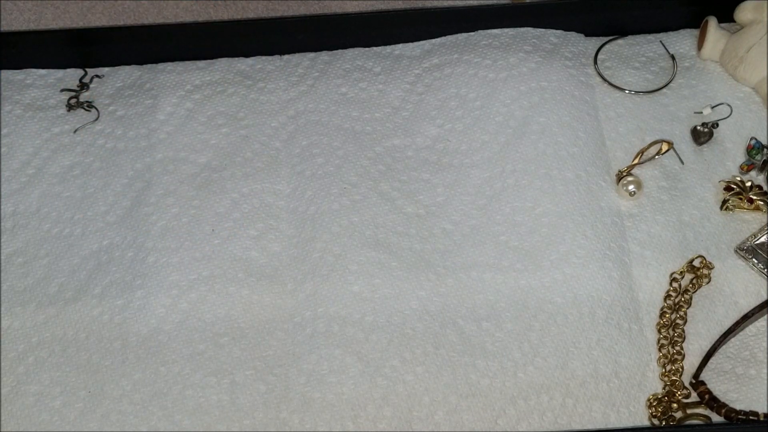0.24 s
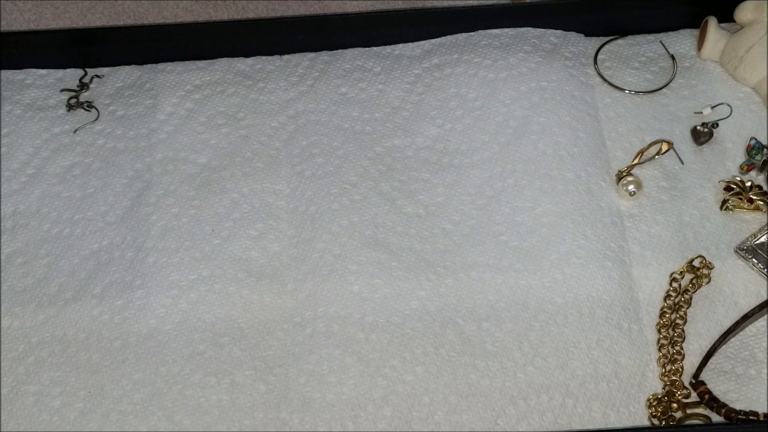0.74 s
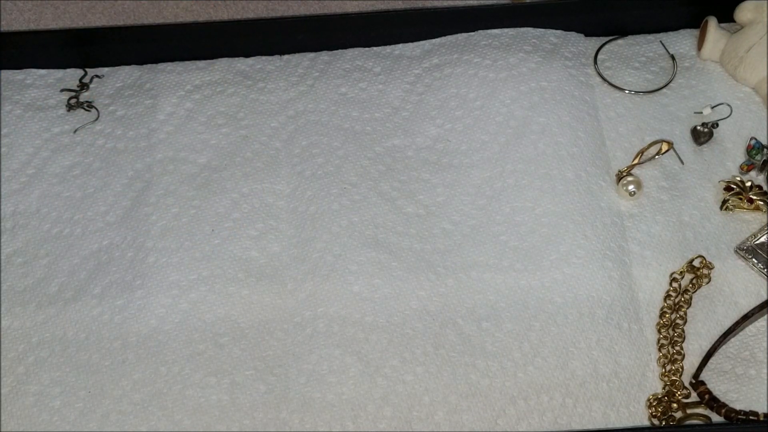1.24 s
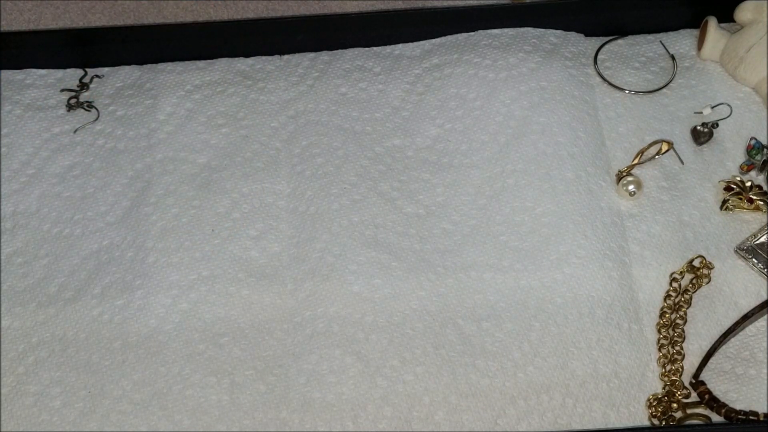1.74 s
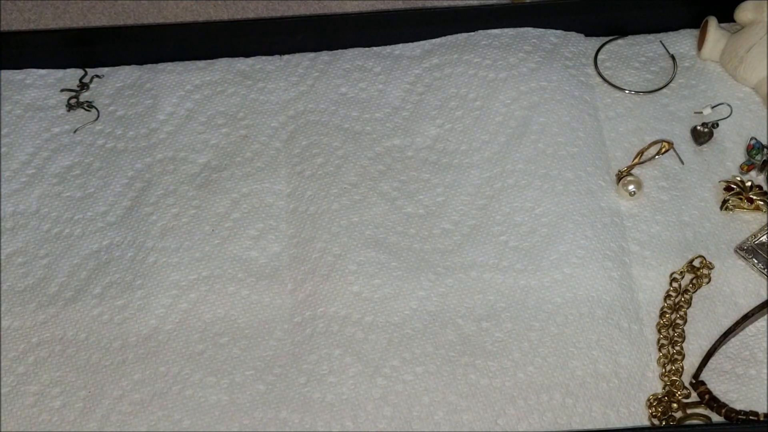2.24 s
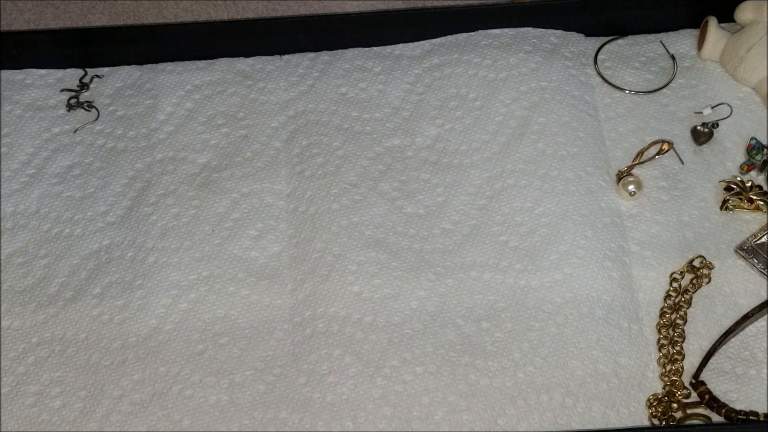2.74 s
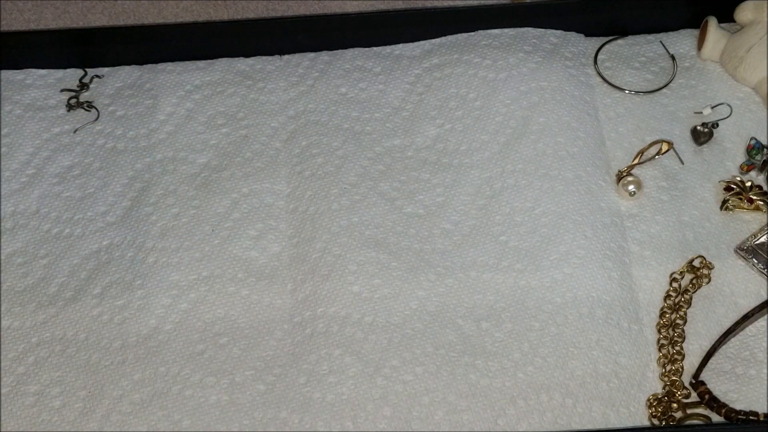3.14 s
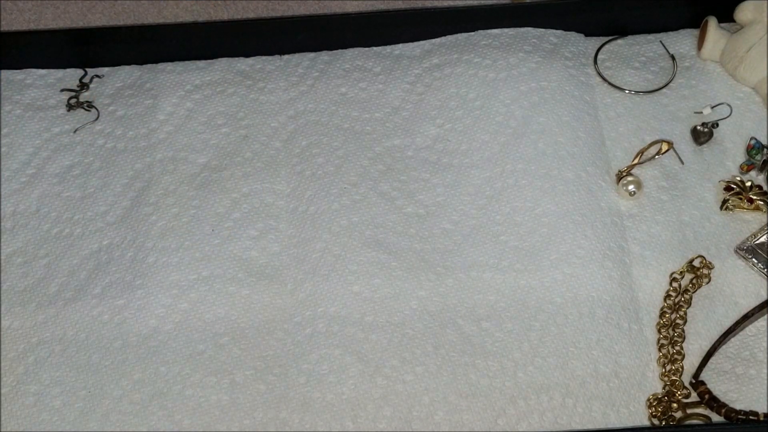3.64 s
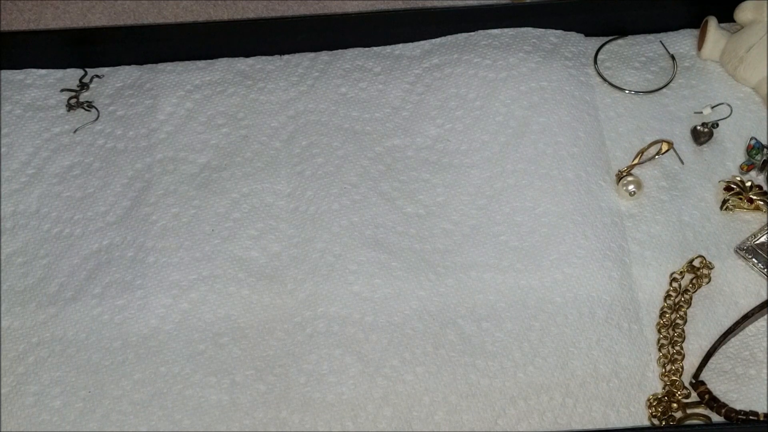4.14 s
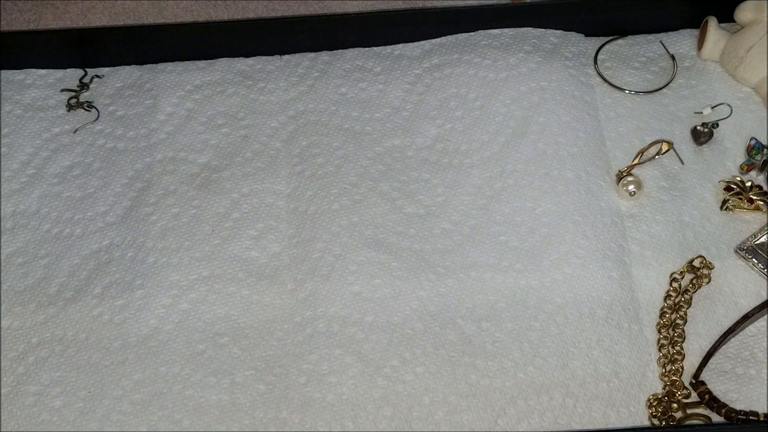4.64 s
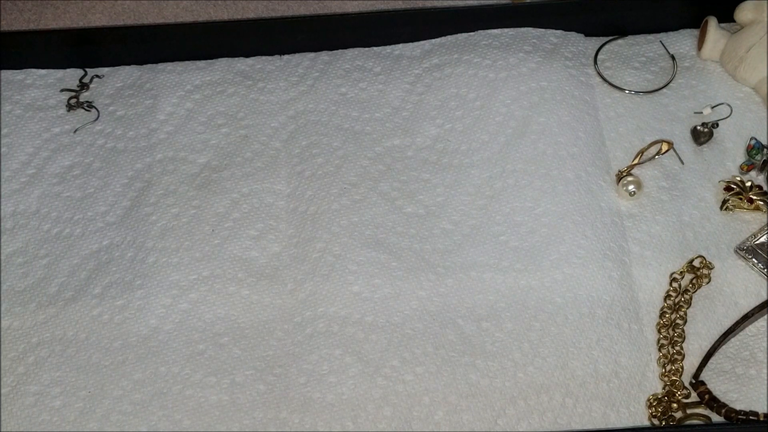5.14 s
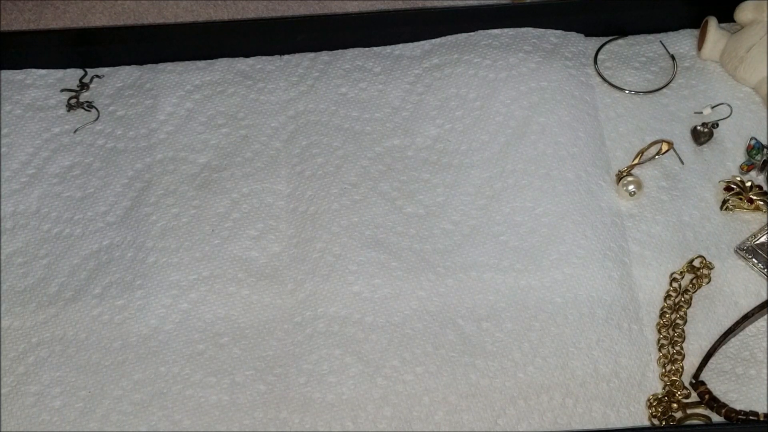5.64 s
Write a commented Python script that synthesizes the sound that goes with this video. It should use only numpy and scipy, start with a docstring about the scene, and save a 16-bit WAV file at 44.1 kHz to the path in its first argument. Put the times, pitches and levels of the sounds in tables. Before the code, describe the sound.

Jewelry is sorted at a table, heard very close and dry, slightly to the right. Sparse faint ticks come first, then a short scrape and the loudest moment: a hard clack with rapid bounces. Near-silence follows, broken by a dull knock, before high metallic clinks and rustling chains jangle irregularly in a jar with low thuds until the end.

```python
"""Jewelry is sorted at a table in a quiet, faintly hissing room, close to two microphones.
Small pieces tick in the fingers; a hard piece scrapes, drops, bounces and rattles to rest; the table takes
a dull knock; then a hand rummages in a jar: chains and trinkets clink and jangle, and bump the jar.
Each contact is a snap, a crack of coloured noise and decaying sine modes; single contacts are placed
by time, and sliding, rubbing and rattling are many random small ones."""
import sys
import numpy as np
from scipy import signal
from scipy.fft import rfft, irfft, next_fast_len
from scipy.io import wavfile
from scipy.ndimage import uniform_filter1d

SR = 44100
rng = np.random.default_rng(int(sys.argv[2]) if len(sys.argv) > 2 else 0)


def wav_out(sig):
    """Save sig, one row per channel (or a flat mono array), as 16-bit PCM at SR to the path in sys.argv[1]."""
    wavfile.write(sys.argv[1], SR, np.round(np.clip(np.atleast_2d(sig).T, -1, 1) * 32767).astype(np.int16))


N = 259749
SIZE = 12288  # samples per contact sound
T = np.arange(SIZE) / SR
HZ = np.fft.rfftfreq(SIZE, 1 / SR)
PIECE_SIZES = .09  # pitch spread among small pieces, natural-log units

# strokes of the hand through the jar: start_s, length_s, chains_sliding_db (relative),
# heap_rubbing_wall_db (relative)
STIRS = [(4.238, 0.027, -76, -57.5), (4.386, 0.077, -52.5, -58.5), (4.483, 0.12, -49.5, -54),
         (4.565, 0.19, -45, -55), (4.77, 0.14, -62.5, -67.5), (4.909, 0.11, -49, -57),
         (5.022, 0.16, -46, -56), (5.20, 0.024, -35.5, -52), (5.337, 0.23, -64, -65.5),
         (5.511, 0.053, -41, -57.5), (5.615, 0.043, -44, -55.5), (5.695, 0.099, -63, -55.5),
         (5.784, 0.077, -75, -47)]
# a stroke gathers speed, holds, then settles (time to fall 60 dB)
STIR_ATTACK_S, STIR_SETTLE_S = 0.018, 0.19


def amp(db):
    """Decibels to gain."""
    return 10 ** (np.asarray(db) / 20)


def read(points, hz):
    """A spectrum joined by straight lines on a log-frequency axis."""
    f, value = np.transpose(points)
    return np.interp(np.log(hz + 1), np.log(f + 1), value)


def unit(x):
    """Scales each stereo sound to a mean energy of 1 per channel."""
    energy = (x ** 2).sum((-2, -1), keepdims=True) / 2
    return x / np.sqrt(energy + 1e-20)


def coloured(x, gain_db):
    """Minimum-phase filter: the colour rings after a click, never before it."""
    cepstrum = irfft(np.log(amp(gain_db)))
    cepstrum[..., 1:SIZE // 2] *= 2
    cepstrum[..., SIZE // 2 + 1:] = 0
    response = np.exp(rfft(cepstrum))
    return irfft(rfft(x) * response)


def ports(x, width):
    """Two close microphones: the side-to-mid ratio sets how alike they are at each frequency."""
    size = next_fast_len(N)
    left, right = rfft(x, size)
    side = amp(read(width, np.fft.rfftfreq(size, 1 / SR)))
    mid_part = left + right
    side_part = side * (left - right)
    pair = np.array([mid_part + side_part, mid_part - side_part])
    return irfft(pair / np.sqrt(2 + 2 * side ** 2), size)[:, :N]


def blows(count, modes, colour, crack_t60, snap_db, ring_db, scatter_db, sizes=0, patchy_db=0):
    """Different blows on one object: a snap, a crack of decaying noise, and its ringing modes."""
    crack = unit(rng.standard_normal((count, 2, SIZE)) * amp(-60 * T / crack_t60))
    crack[:, :, 0] += amp(snap_db)
    # each contact has broad peaks of its own, fullest in the treble
    patches = uniform_filter1d(rng.standard_normal((count, 1, len(HZ))), size=170)
    patches *= np.minimum(HZ / 4000, 1) / patches.std()
    crack = unit(coloured(crack, read(colour, HZ) + patchy_db * patches))

    hz, db, t60 = np.transpose(modes)[:, :, None]
    # pieces of other sizes ring at other pitches; modes up to 2500 Hz stay put
    detune = sizes * rng.standard_normal((count, len(modes), 1)) * (hz > 2500)
    pitch = hz * np.exp(detune)
    shapes = amp(db - 60 * T / t60) * np.sin(np.float32(2 * np.pi * pitch * T))

    # the place of contact sets each mode's strength; high modes reach each microphone with either sign
    chance = rng.standard_normal((count, 2, 2, len(modes)))
    weights = amp(scatter_db * np.clip(chance[:, 0], -1.5, 1.5))
    weights *= np.sign(chance[:, 1] + (1800 / hz.T) ** 2)
    weights *= (-1) ** np.arange(len(modes))  # neighbouring modes swing opposite ways
    ring = unit(weights @ shapes)
    return unit(crack + amp(ring_db) * ring)


def strikes(rows, sounds, gain_db, focus_db=0):
    """One blow per row, tilted in brightness and emphasized near its own centre frequency if it has one."""
    out = np.zeros((2, N + SIZE))
    octaves = np.log2(np.maximum(HZ, 300) / 2000)
    for (s, db, tilt, *centre), sound in zip(rows, sounds):
        focus = sum(np.exp(-(np.log2((HZ + 1) / hz) / 0.22) ** 2) for hz in centre)
        blow = unit(coloured(sound, tilt * octaves + focus_db * focus))
        start = round(s * SR)
        out[:, start:start + SIZE] += amp(db + gain_db) * blow
    return out[:, :N]


def by_pitch(rows, neutral_hz, slope_db):
    """Brightness (dB per octave) rises by slope_db for each octave of pitch above neutral_hz."""
    return [(s, db, slope_db * np.log2(hz / neutral_hz), hz) for s, db, hz in rows]


def motion(rows, attack_s, settle_s):
    """Strength of a run of movements: each rises, holds for its length, and dies away."""
    t = np.arange(N) / SR
    strokes = []
    for start, length, db in rows:
        rise = np.clip((t - start) / attack_s, 0, 1)
        after_s = np.maximum(t - start - length, 0)
        strokes.append(rise * amp(db - 60 * after_s / settle_s))
    return np.max(strokes, axis=0)


def patter(strength, sounds, per_s, spread_db, gain_db):
    """Many small random contacts whose force follows the strength of a movement."""
    moving = np.flatnonzero(strength > amp(-95))
    at = np.arange(moving[0], moving[-1])
    chance, force, which, side = rng.random((4, N))[:, at]
    clicks = (chance < per_s / SR) * amp(spread_db * force) * np.sign(side - .5)
    rms = np.sqrt(np.mean(clicks ** 2) + 1e-20)
    clicks *= strength[at] * amp(gain_db) / rms
    choice = (which * len(sounds)).astype(int)
    out = np.zeros((2, N + SIZE))
    for k, sound in enumerate(sounds):
        train = clicks * (choice == k)
        out[:, at[0]:at[-1] + SIZE] += signal.fftconvolve(train[None], sound, axes=1)
    return out[:, :N]


def air(waver_db):
    """Shaped noise: a low room murmur of machinery, wavering below 500 Hz, under faint microphone hiss."""
    # still room: hz, density_db (relative)
    air_spectrum = [(15, -58), (25, -33.5), (64, -10.5), (102, -17), (157, -7), (248, -3), (316, -12.5),
                    (403, -17.5), (473, -15), (542, -21.5), (691, -22), (812, -23), (2460, -25.5),
                    (8050, -39.5), (15800, -30.5)]
    # stereo width: hz, side_minus_mid_db
    air_width = [(60, -10.5), (110, -10), (200, -11.5), (380, -4), (700, -0.5), (1290, 0.5), (2380, 0),
                 (4400, -0.5), (8120, 0), (15000, 0)]
    rms_db = -62
    hz, t, z = signal.stft(rng.standard_normal((2, N)), SR, nperseg=2048, noverlap=1536)
    patches = uniform_filter1d(rng.standard_normal(z.shape[1:]), size=10, axis=1)
    patches = uniform_filter1d(patches, size=4, axis=0)
    waver = waver_db * patches / patches.std() * (hz < 500)[:, None]
    field_db = read(air_spectrum, hz)[:, None] + waver
    noise = signal.istft(z * amp(field_db), SR, nperseg=2048, noverlap=1536)[1][:, :N]
    return amp(rms_db) * np.sqrt(N) * ports(unit(noise), air_width)


def room(x, wet_db):
    """Short reflections of a furnished room: a noise tail with a decay time for each frequency."""
    # decay: hz, t60_s
    room_t60 = [(200, 0.2), (1000, 0.066), (4000, 0.11), (15000, 0.091)]
    hz, t, z = signal.stft(rng.standard_normal((2, SR // 2)), SR, nperseg=256)
    decay = amp(-60 * t / read(room_t60, hz)[:, None])
    tail = signal.istft(z * decay, SR, nperseg=256)[1]
    tail *= np.clip(np.arange(tail.shape[1]) / SR / 0.0035 - .5, 0, 1)  # fades in over 1.75-5.25 ms
    return x + amp(wet_db) * signal.fftconvolve(x, unit(tail), axes=1)[:, :N]


def fingers():
    """Faint ticks of small pieces turned in the hand: short blows on lightly ringing modes."""
    # ticks: start_s, level_db (relative), pitch_hz
    ticks = [(0.1007, -52, 2280), (0.4279, -55, 2200), (0.4924, -52.5, 1640), (0.5232, -52, 1640),
             (0.619, -38.5, 3400), (0.7103, -46.5, 3400), (0.7272, -43, 3170), (0.7477, -39.5, 2170),
             (0.9048, -43, 2530), (1.1154, -45.5, 1800), (1.7853, -38, 2450), (1.9475, -47, 2000),
             (2.7157, -44.5, 3300), (2.7224, -41.5, 4300), (2.7357, -36.5, 4360), (3.5538, -51, 1900)]
    # modes of a held piece: pitch_hz, level_db (relative), t60_s
    held_modes = [(1640, 6.5, 0.047), (1900, 4.5, 0.063), (2226, 0.5, 0.075), (2640, -4, 0.13),
                  (3400, -1.5, 0.15)]
    # crack colour: hz, density_db (relative)
    tick_colour = [(30, -52), (300, -31), (1100, -7), (1800, -8), (3000, -3.5), (5000, -10), (8000, -14.5),
                   (12000, -11.5), (15500, -14)]
    sounds = blows(count=len(ticks), modes=held_modes, colour=tick_colour, crack_t60=.05,
                   snap_db=-5, ring_db=-5, scatter_db=3, sizes=PIECE_SIZES)
    rows = by_pitch(ticks, neutral_hz=2800, slope_db=6)
    return strikes(rows, sounds, gain_db=14, focus_db=5.5)


def bounces(count, order):
    """Ever shorter, weaker hops (count), each landing askew on several corners (order) in turn."""
    landing_s, flight_s = 2.9477, .0535
    rebound = .69  # share of the flight time that each bounce keeps
    landing_db, landing_tilt_db = -5, -1  # relative level; brightness, dB per octave
    bounce_loss_db, bounce_tilt_db = 3, 1.14  # loss grows with hop squared; each hop is brighter
    corner_gap_s, corner_loss_db = .0038, 2.5
    body_hz = 1600  # emphasized body of the piece
    landings = landing_s + flight_s * (1 - rebound ** np.arange(count)) / (1 - rebound)
    rows = []
    for hop, s in enumerate(landings):
        hop_db = landing_db - hop ** 2 * bounce_loss_db
        tilt_db = landing_tilt_db + hop * bounce_tilt_db
        for corner in range(order):
            rows.append((s + corner * corner_gap_s, hop_db - corner * corner_loss_db, tilt_db, body_hz))
    return rows


def dropped_piece():
    """A hard piece scrapes in fast slips, lands and bounces on table modes, and chatters to rest."""
    # scrapes before the fall: start_s, length_s, level_db (relative)
    scrapes = [(2.695, 0.22, -64.5), (2.79, 0.02, -41.5), (2.865, .05, -46.5)]
    # modes of the scraping edge: pitch_hz, level_db (relative), t60_s
    scrape_modes = [(572.6, 2, 0.023), (800, -5.5, 0.021), (1192, 2.5, 0.052), (1800, -6.5, 0.025),
                    (2970, -1, 0.019), (2850, 5, 0.045)]
    # scrape colour: hz, density_db (relative)
    scrape_colour = [(25, -51.5), (280, -26.5), (450, 3.5), (1200, -1.5), (2200, -12), (2900, -3),
                     (3800, -18), (5500, -12.5), (7500, -25), (15500, -20.5)]
    slips = blows(count=8, modes=scrape_modes, colour=scrape_colour, crack_t60=.02,
                  snap_db=-8.5, ring_db=-5, scatter_db=2)
    scraping = motion(scrapes, attack_s=.012, settle_s=0.08)
    scrape = patter(scraping, slips, per_s=2100, spread_db=5.0, gain_db=3.5)

    # grazes of the table around the bounces: start_s, level_db (relative), brightness_db_per_octave
    grazes = [(2.794, -25, -1), (2.817, -33.5, -4.5), (2.905, -26.5, 8.5), (2.989, -25, 3),
              (3.075, -18.5, 3.5), (3.107, -25.5, 3)]
    # modes of the piece on the table: pitch_hz, level_db (relative), t60_s
    table_modes = [(341, -13, .18), (484, -13, .18), (585, -13, .17), (689, -12, .15), (845, -8, .15),
                   (956, 0, .16), (1127, 2, .16), (1239, -5, .14), (1369, -1, .13), (1498, -2, .14),
                   (1632, -4, .13), (1725, 7, .13), (1839, -2, .13), (1945, -2, .13), (2099, -1, .12),
                   (2233, -4, .14), (2485, -9, .12), (2700, -7, .1), (4200, -9, .05), (5830, -6, .05)]
    # landing colour: hz, density_db (relative)
    drop_colour = [(25, -49), (100, -33), (270, -27.5), (360, -8.5), (1000, 0), (1800, -1.5), (2500, -3),
                   (3500, -12), (4400, -10.5), (6000, -17.5), (7500, -24), (10000, -20.5), (15500, -23.5)]
    contacts = bounces(count=3, order=3) + grazes
    hits = blows(count=len(contacts), modes=table_modes, colour=drop_colour, crack_t60=.032,
                 snap_db=-10, ring_db=-4, scatter_db=1)
    landing = strikes(contacts, hits, gain_db=15.5, focus_db=2.5)

    # rocking to rest: start_s, length_s, level_db (relative)
    chatters = [(2.945, 0.2, -36.5)]
    # chatter colour: hz, density_db (relative)
    chatter_colour = [(25, -52), (280, -26.5), (350, 2.5), (500, 7.5), (750, 1.5), (1200, -1), (1800, -13),
                      (2600, -4), (3400, -4), (4400, -9), (5200, -14.5), (5950, -1.5), (6500, -17),
                      (7200, -22), (11000, -14), (15500, -26)]
    taps = blows(count=8, modes=table_modes, colour=chatter_colour, crack_t60=0.057,
                 snap_db=-10, ring_db=-11.5, scatter_db=5.0, patchy_db=2.5)
    rocking = motion(chatters, attack_s=0.049, settle_s=0.11)
    chatter = patter(rocking, taps, per_s=830, spread_db=14.5, gain_db=1.0)
    return scrape + landing + chatter


def jar():
    """Dull knocks on low modes, and the heap rubbing the wall as many weak contacts."""
    # knocks of jar and table: start_s, level_db (relative), brightness_db_per_octave, centre_hz
    knocks = [(3.676, -47, 0.5, 437), (4.108, -14, 3.5, 657), (4.114, -28, 5.5, 616),
              (4.547, -20, 8.5, 670), (4.566, -26, 6, 680), (4.637, -22.5, -2.2, 696),
              (4.651, -32, 5.5, 735), (4.694, -27.5, 8, 414), (5.005, -35.5, -8, 370),
              (5.429, -27.5, 0.5, 826), (5.482, -32.5, 0.5, 450), (5.725, -32, -2, 420)]
    # modes of the jar on the table: pitch_hz, level_db (relative), t60_s
    jar_modes = [(260, 1, 0.14), (370, 4.5, 0.032), (441, -2.5, 0.21), (532, 0, 0.17), (714, 18, 0.03),
                 (913, 18.5, 0.017), (1140, -17, 0.18)]
    # knock colour: hz, density_db (relative)
    knock_colour = [(25, -33), (70, -27), (150, -7), (300, 7), (700, -4), (1200, -6), (2200, -10.5),
                    (4000, -23.5), (8000, -39), (15500, -41)]
    # rub colour: hz, density_db (relative)
    rub_colour = [(25, -34), (85, -2), (160, -11.5), (280, -3), (480, 6.5), (700, -5.5), (1200, -9),
                  (2200, -11.5), (4000, -25), (15500, -40)]
    thuds = blows(count=len(knocks), modes=jar_modes, colour=knock_colour, crack_t60=.045,
                  snap_db=0, ring_db=-1, scatter_db=1.5)
    rubs = blows(count=6, modes=jar_modes, colour=rub_colour, crack_t60=.05,
                 snap_db=-3, ring_db=-11, scatter_db=3)
    wall_rows = [(s, length, db) for s, length, _, db in STIRS]
    shifting = motion(wall_rows, STIR_ATTACK_S, STIR_SETTLE_S)
    rustle = patter(shifting, rubs, per_s=900, spread_db=12, gain_db=-1.0)
    return strikes(knocks, thuds, gain_db=11.5, focus_db=7.0) + rustle


def trinkets():
    """Single bright clinks of metal modes over the fine jangle of chain links."""
    # loudest clinks in the jar: start_s, level_db (relative), pitch_hz
    clink_rows = [(4.5062, -28, 3840), (4.5456, -32, 13200), (4.5604, -32.5, 12000), (4.5989, -33.5, 6300),
                  (4.6259, -24, 4050), (4.6798, -25, 3550), (4.6902, -17.5, 13050), (4.7805, -36.5, 5100),
                  (4.864, -45.5, 2330), (5.0514, -30, 9300), (5.0998, -22.5, 8350), (5.1243, -19.5, 3800),
                  (5.1682, -32.5, 10200), (5.1926, -35, 10300), (5.2165, -22.5, 8900), (5.2285, -23, 4600),
                  (5.2374, -19.5, 11040), (5.455, -37.5, 9300), (5.5154, -35, 3500), (5.5448, -26.5, 4300),
                  (5.6106, -26, 3840), (5.6351, -20, 3500), (5.6725, -33, 4100), (5.7229, -39.5, 12600),
                  (5.8042, -29.5, 11500)]
    # modes of the trinkets: pitch_hz, level_db (relative), t60_s
    metal_modes = [(2150, -1, .08), (2270, -3, .07), (3660, 0, .04), (4130, 1, .035), (5100, -4, .04),
                   (6280, -3, .05), (6940, -4, .05), (8630, -3, .05), (9100, -4, .05), (10250, -3, .05),
                   (10900, -3, .05), (12200, -5, .04), (13300, -4, .05), (14700, -5, .04)]
    # clink colour: hz, density_db (relative)
    clink_colour = [(25, -33), (150, -12), (500, -8.5), (1700, -13), (2200, 4.5), (2800, -2.5), (3900, 2),
                    (5500, -1), (6700, 1.5), (7800, -5), (9000, -2), (11000, -3), (13000, -2.5),
                    (15500, -2)]
    clinks = blows(count=len(clink_rows), modes=metal_modes, colour=clink_colour, crack_t60=.04,
                   snap_db=-16, ring_db=-4, scatter_db=3, sizes=PIECE_SIZES, patchy_db=2)
    links = blows(count=24, modes=metal_modes, colour=clink_colour, crack_t60=.02,
                  snap_db=-12, ring_db=0, scatter_db=4.5, sizes=PIECE_SIZES, patchy_db=3.5)
    chain_rows = [(s, length, db) for s, length, db, _ in STIRS]
    sliding = motion(chain_rows, STIR_ATTACK_S, STIR_SETTLE_S)
    jangle = patter(sliding, links, per_s=360, spread_db=18.5, gain_db=-5.5)
    rows = by_pitch(clink_rows, neutral_hz=6140, slope_db=2.4)
    return strikes(rows, clinks, gain_db=15.5, focus_db=7.5) + jangle


def scene():
    """All the handling in the room, mostly a little to the right, over the room's air."""
    # stereo width: hz, side_minus_mid_db
    near_width = [(100, -9), (380, -19), (700, -5.5), (1300, -3), (2400, 1), (4400, -3), (8000, -0.5),
                  (15000, -2)]
    # stereo balance: hz, left_minus_right_db
    balance = [(300, -0.5), (1200, -1.5), (2600, -2.5), (5500, 0), (8000, -4), (11000, -7.5), (13500, 2.5),
               (16000, 3.5)]
    near = room(fingers() + trinkets(), wet_db=-5.0)
    near = near + room(dropped_piece(), wet_db=-7.5)
    near = near + room(jar(), wet_db=-2.5)
    size = next_fast_len(N)
    lean_db = read(balance, np.fft.rfftfreq(size, 1 / SR)) / 2
    spectrum = rfft(ports(near, near_width), size)
    heard = irfft(spectrum * amp([lean_db, -lean_db]), size)[:, :N]
    return heard + air(waver_db=1.5)


def record(dry):
    """The recorder's band limit: a steep linear-phase low-pass."""
    edge_hz = 15950
    lowpass = signal.firwin(255, edge_hz, window=("kaiser", 8), fs=SR)
    return signal.oaconvolve(dry, lowpass[None], "same")


dry = scene()
out = record(dry)
wav_out(out)
```